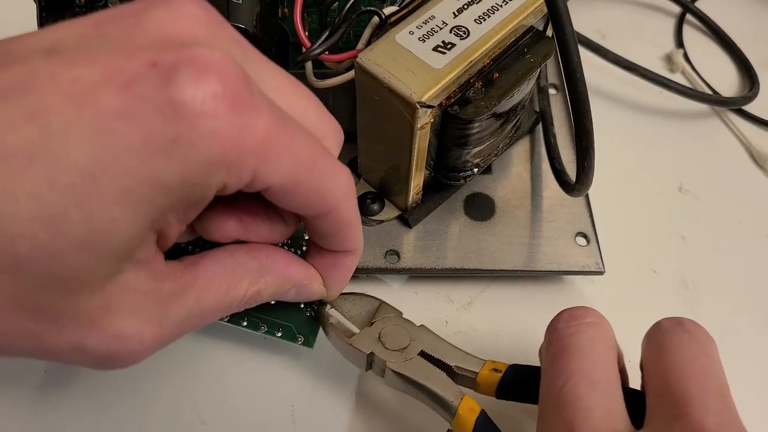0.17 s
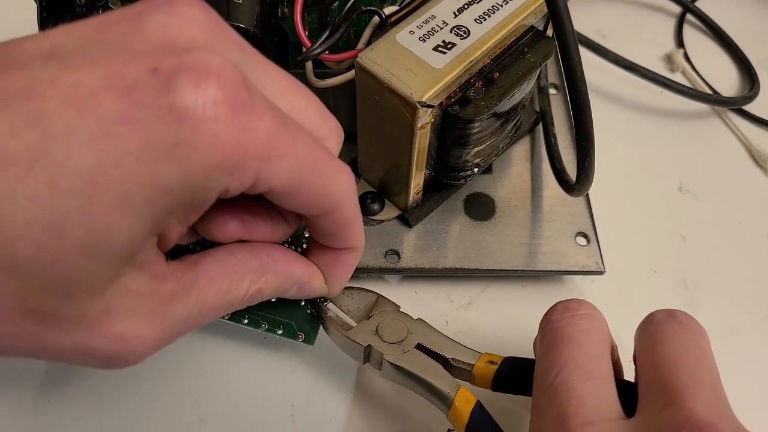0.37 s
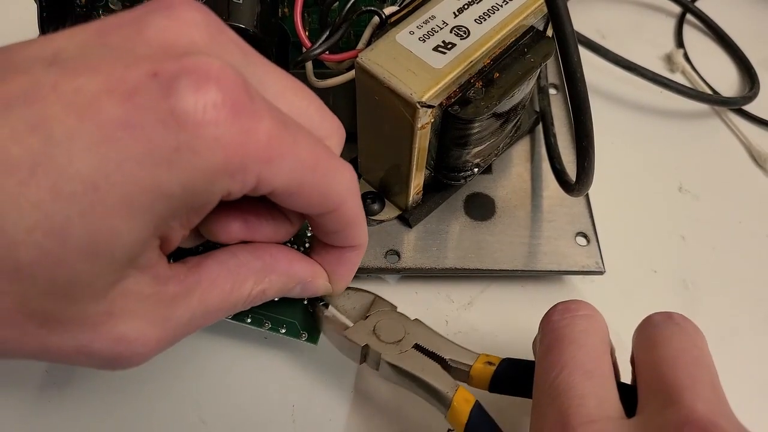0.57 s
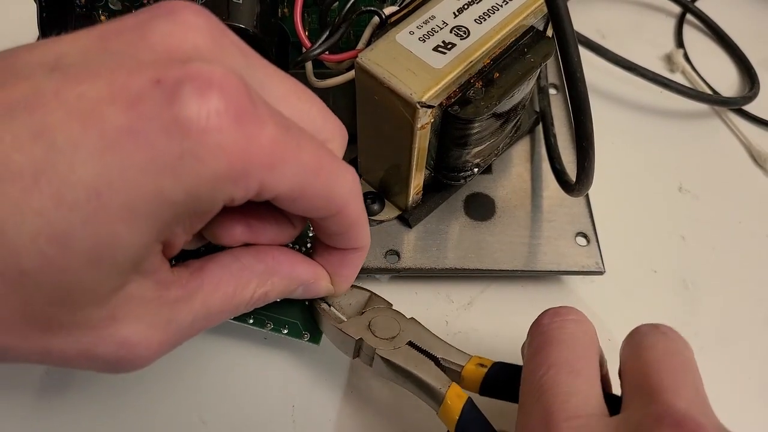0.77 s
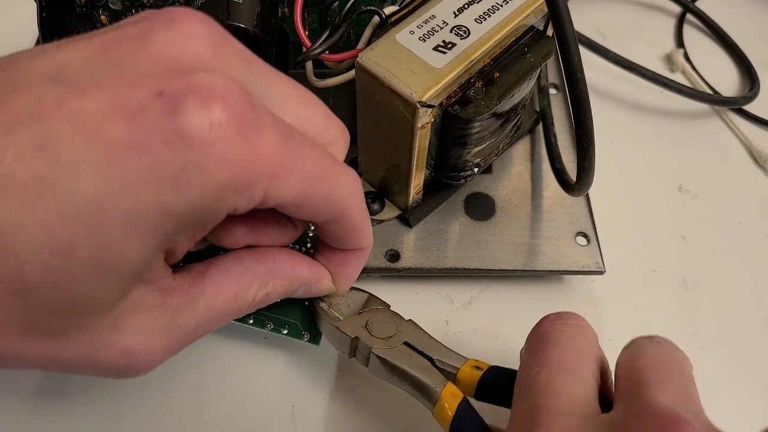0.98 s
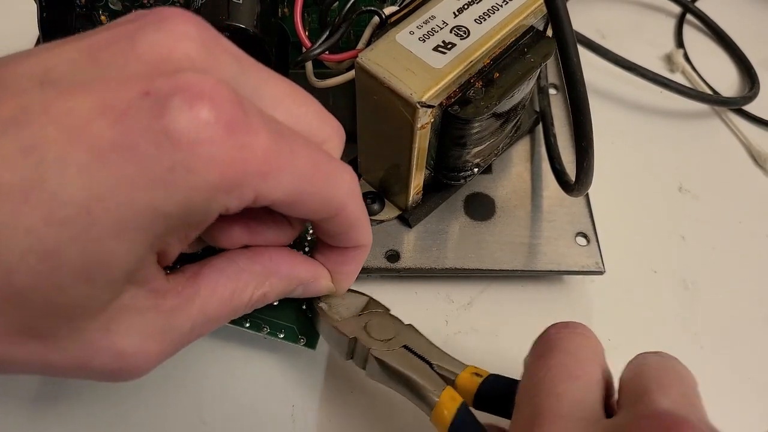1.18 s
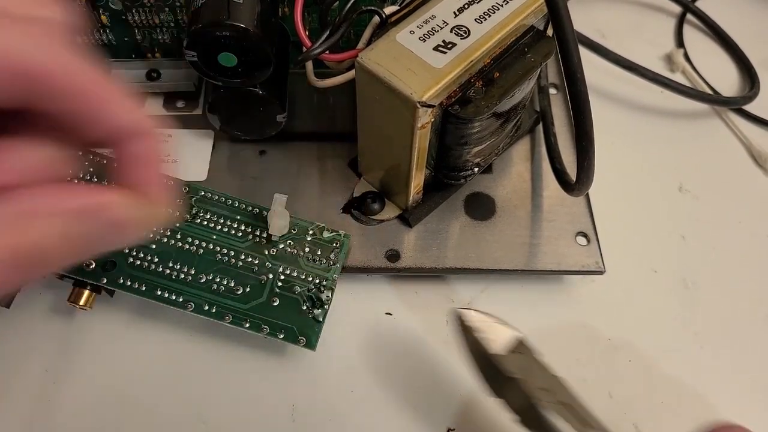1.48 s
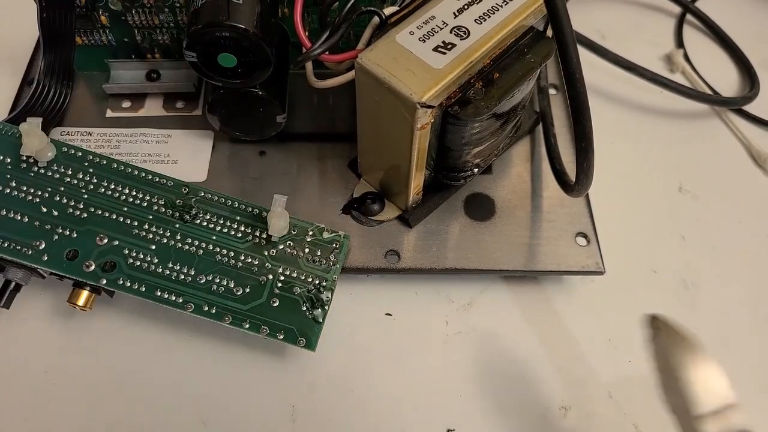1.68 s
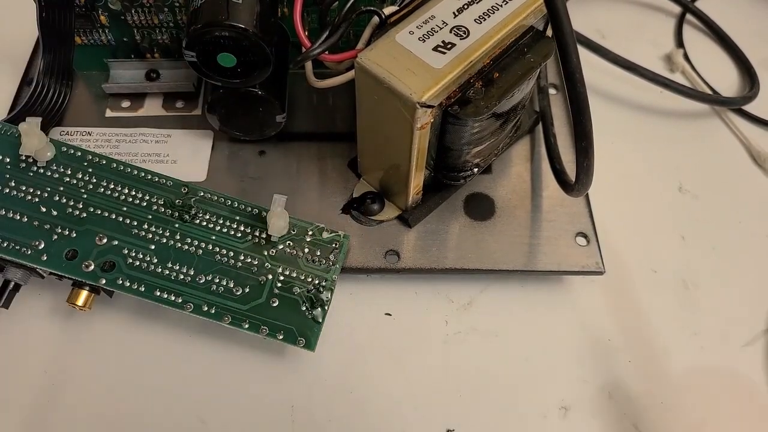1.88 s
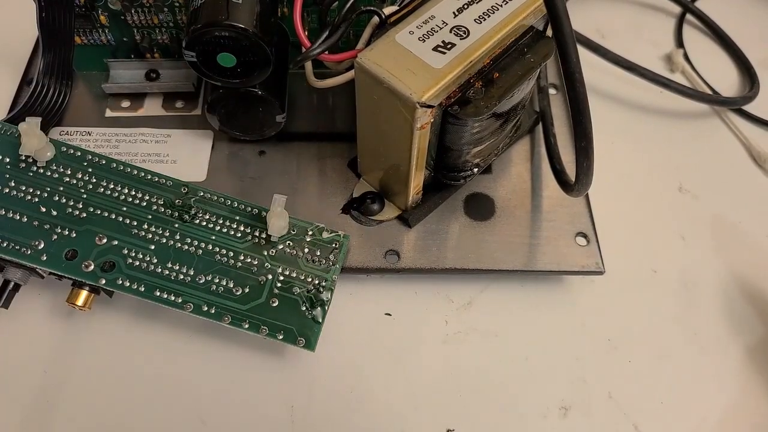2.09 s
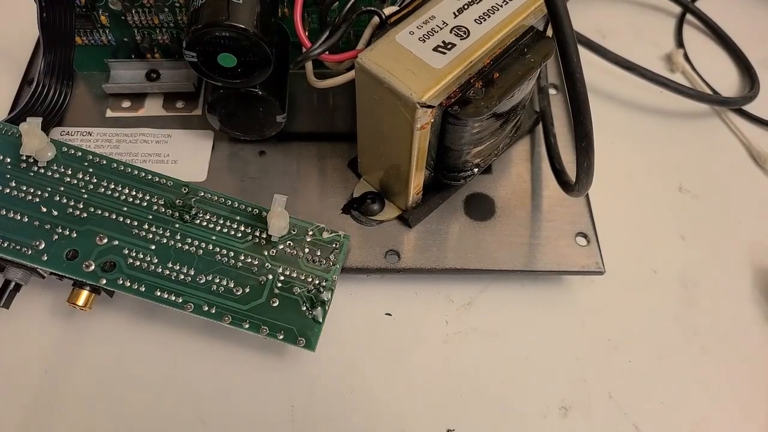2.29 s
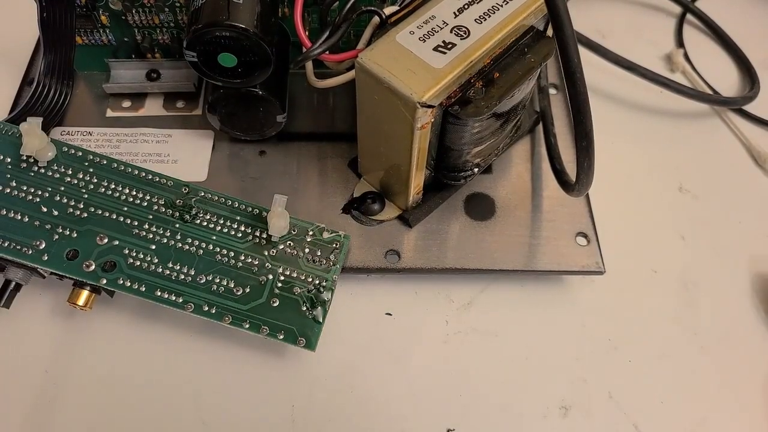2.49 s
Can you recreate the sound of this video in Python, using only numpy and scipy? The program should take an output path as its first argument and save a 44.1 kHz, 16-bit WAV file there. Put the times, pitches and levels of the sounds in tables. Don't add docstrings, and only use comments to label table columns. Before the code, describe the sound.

Close up in a quiet, faintly hissy room, cutter jaws scrape and tick on a circuit board, one crisp snip rings out, a sleeve brushes the bench, and the tool is put down with two bouncing knocks.

```python
import sys
import numpy as np
from scipy import signal
from scipy.fft import rfft, irfft
from scipy.io import wavfile
from scipy.ndimage import uniform_filter1d

SR = 44100
rng = np.random.default_rng(int(sys.argv[2]) if len(sys.argv) > 2 else 0)


def waveform_to_disk(signal):
    frames = np.transpose(np.atleast_2d(signal))
    scaled = np.clip(frames, -1, 1) * 32767
    samples = np.round(scaled).astype(np.int16)
    wavfile.write(sys.argv[1], SR, samples)


def linear_from_db(decibels):
    return 10 ** (np.asarray(decibels, float) / 20)


N = 116865
T = np.arange(N) / SR

SOUND_SIZE = 16384
LEAD_S = 0.004
PORT_UNLIKE = 0.86

# frequency in Hz, level in dB.
ROOM_TONE_COLOUR = [(25, -9), (240, -8.5), (450, -13.5), (1050, -21.5), (1700, -22), (3000, -18.5),
                    (6800, -26), (7400, -50), (11500, -31.5), (16000, -40.5), (16600, -75)]
# frequency in Hz, time to fall 60 dB in seconds.
ROOM_DECAY = [(100, 0.5), (500, 0.33), (2000, 0.32), (6000, 0.17), (15000, 0.26)]
# frequency in Hz, level in dB.
MIC_TOP = [(16600, 0), (17000, -30)]
# time in seconds, level in dB.
SLEEVE_LEVEL = [
    (1.6, -85),
    (1.721, -64),
    (1.9, -63),
    (2.0, -66.5),
    (2.098, -57),
    (2.2, -65.5),
    (2.299, -65),
]
# frequency in Hz, level in dB.
SLEEVE_COLOUR = [(80, -15.5), (280, 2.5), (700, -4.5), (1300, -11.5), (3500, -14.5), (5000, -18.5),
                 (8000, -32), (16000, -35)]
# start and end in seconds, level in dB, start and end frequency in Hz.
SLEEVE_WHISTLES = [
    (1.63, 1.73, -73, 1050, 1150),
    (1.78, 1.96, -72, 1740, 1880),
    (1.73, 1.93, -69.5, 3350, 3900),
    (1.62, 1.72, -79.5, 2750, 2300),
    (1.6, 4.6, -67, 601, 420),
    (2.07, 2.24, -65, 950, 910),
    (1.29, 1.56, -86, 740, 830),
    (2.09, 2.13, -57.5, 4400, 2400),
    (1.95, 2.2, -77.5, 3900, 4200),
]
# start in seconds, frequency in Hz, length in
# seconds, peak level in dB, # place of the peak from 0 to 1.
SQUEAKS = [
    (0.036, 2152, 0.023, -39.5, 0.37),
    (0.062, 2126, 0.058, -56.5, 0.1),
    (0.668, 2260, 0.019, -42, 0.66),
    (0.693, 2283, 0.036, -55.5, 0.15),
    (1.012, 1774, 0.0091, -48, .9),
    (2.306, 1080, 0.046, -46, .8),
]
# start in seconds, bench peak, board and jaws levels in dB,
# jaws resonance in Hz.
TAPS = [(0.058, -66, -69, -56.5, 2800), (0.075, -48, -66.5, -59.5, 1510), (0.09, -59.5, -67, -58.5, 2870),
        (0.104, -53, -66.5, -81, 2130), (0.203, -71, -75, -56, 2900), (0.265, -40.5, -57, -57, 2130),
        (0.315, -38.5, -52, -56.5, 2850), (0.344, -50, -88, -61.5, 2300), (0.376, -51, -73, -59, 2820),
        (0.507, -49.5, -49.5, -53.5, 1300), (0.534, -53.5, -63, -60.5, 2830),
        (0.553, -47, -63, -51.5, 2900), (0.608, -46.5, -55, -47, 1300), (0.623, -42, -66.5, -61, 1700),
        (0.744, -53.5, -75, -89, 2330), (0.816, -49.5, -56, -58.5, 2960), (1.223, -53, -70.5, -92.5, 1700),
        (1.555, -45, -60.5, -67, 2720), (1.614, -49, -64, -72, 2774), (1.721, -57, -74, -54, 1490),
        (1.735, -45.5, -62.5, -63, 3400), (1.922, -53, -77, -64, 3060), (1.995, -43.5, -69, -79, 1826),
        (2.078, -69, -83, -59, 2170), (2.11, -53.5, -64.5, -68, 2010)]
# frequency in Hz, level in dB, time to fall 60 dB in seconds.
BENCH_MODES = [(101, -13, 0.29), (169.5, -1.5, 0.2), (239.2, 5, 0.12), (280.6, -4.5, 0.22), (350, -8, 0.13)]
# frequency in Hz, level in dB, time to fall 60 dB in seconds.
BOARD_MODES = [(567, -1.5, 0.12), (666, -2.5, 0.14), (823, -9, 0.024), (1067, 4, 0.044), (1230, -1, 0.027),
               (1620, -2.5, .025)]
# frequency in Hz, level in dB.
JAWS_COLOUR = [(200, -33), (1500, 9), (3500, 0), (5000, -0.5), (7000, -22), (15000, -18.5)]
# start in seconds, crack level in dB, crack time to fall 60 dB in seconds,
# ring level in dB, lag of the left port in seconds.
BLOWS = [
    (1.0275, -13.5, 0.035, -18.5, -.00028),
    (2.3313, -20, 0.049, -12, .0001),
    (2.5852, -7, 0.044, -6, .0001),
]
# frequency in Hz, level in dB.
CRACK_COLOURS = [
    [(40, -51.5), (400, -16.5), (1000, -6), (2000, 2), (5300, -8), (6800, -19.5), (9000, -22.5),
     (15000, -30), (16500, -29.5)],
    [(60, -11), (300, -8), (700, -10), (1200, -8), (2200, -22.5), (5000, -34.5), (8000, -54),
     (16000, -63.5)],
    [(60, -18), (300, -0.5), (1100, 2), (2100, -3), (3500, -19), (6800, -28), (8500, -37.5), (15000, -40),
     (16500, -72)],
]
# frequency in Hz, level in dB, time to fall 60 dB in seconds.
BLOW_MODES = [
    [(95, -13.5, 0.148), (165.3, 1, 0.29), (241.4, 2, 0.21), (590, -7.5, .08), (1078, 11, 0.048),
     (1300, -0.5, .06), (1740, 7.5, 0.076), (2079, 15, 0.081), (2797, 1.5, 0.067), (3120, 5.5, 0.041),
     (3370, 1, 0.034), (4290, -2.5, 0.027), (5370, -10, 0.063), (8950, -3.5, 0.013)],
    [(168, -6, 0.11), (338, -6.5, 0.056), (553, 1, 0.066), (648, 1, 0.076), (729.5, 8.5, 0.048),
     (959, -2.5, 0.07), (1079, 7.5, 0.05), (1167, -2, 0.069), (1404, -8, .05), (1980, -12.5, .04),
     (2100, -17, 0.092), (3645, -33, .05)],
    [(168.6, -9, 0.19), (428, -11.5, 0.053), (544, -8, 0.1), (662, 1, 0.08), (833, -3.5, 0.076),
     (1097, 5, 0.052), (1143, -5.5, .07), (1425, -5, 0.046), (1660, -2, 0.05), (1995, -1.5, 0.035),
     (2093, -6.5, 0.06), (3400, -18, .04), (4570, -15.5, 0.037), (6760, -5, 0.024)],
]
# start in seconds, number of the blow it resembles, level in dB.
BOUNCES = [
    (2.3366, 1, 0.5),
    (2.342, 1, -10.5),
    (2.351, 1, -9),
    (2.5905, 2, -4),
    (2.603, 2, -12),
    (2.611, 2, -20.5),
    (1.044, 0, -17.5),
    (1.052, 0, -17.5),
]
# start in seconds, frequency in Hz, level in dB,
# time to fall 60 dB in seconds.
THUDS = [
    (1.086, 90.5, -47.5, 0.092),
    (1.145, 90.4, -58, .12),
    (1.2, 127, -53, 0.082),
    (2.274, 58.4, -42.5, 0.15),
    (2.323, 36, -40, 0.17),
    (2.365, 43.7, -34.5, 0.19),
    (2.589, 55.7, -53, .25),
    (2.331, 466, -5.5, 0.011),
    (2.58, 464, -11, 0.026),
]
# start in seconds, level in dB, frequency in Hz.
SPRING_TICKS = [
    (1.924, -47.5, 3500),
    (2.526, -45.5, 14300),
    (2.541, -50, 14000),
    (2.526, -60, 11000),
    (2.541, -57.5, 11000),
]
# share of the tick's frequency, level in dB.
TICK_COLOUR = [(.7, -30), (0.849, -5.5), (1.0, -1.5), (1.12, -8), (1.25, -43)]


def unit(x):
    return x / np.sqrt(np.mean(x ** 2))


def colour(x, points):
    p = np.array(points, float)
    hz = np.fft.rfftfreq(x.shape[-1], 1 / SR) + 1
    gain = linear_from_db(np.interp(np.log(hz), np.log(p[:, 0]), p[:, 1]))
    return irfft(rfft(x) * gain, x.shape[-1])


def band(x, hz, width_hz):
    return signal.lfilter(*signal.iirpeak(hz, hz / width_hz, fs=SR), x)


def fade(t60, size=SOUND_SIZE):
    return np.exp(-np.log(1000) * T[:size] / max(t60, 0.002))


def walk(rate):
    k = int(SR / rate)
    return unit(uniform_filter1d(uniform_filter1d(rng.standard_normal(N), k), k))


def narrow(hz):
    k = int(7 * SR / hz.mean())
    slow = uniform_filter1d(uniform_filter1d(rng.standard_normal((2, 2, N)), k), k)
    phase = 2 * np.pi * np.cumsum(hz) / SR
    return slow[0] * np.cos(phase) + slow[1] * np.sin(phase)


def ring(modes, scatter_db, detune=0.0076, rise_s=0.003):
    chance = rng.standard_normal((len(modes), 3))
    t = np.maximum(T[:SOUND_SIZE] - LEAD_S, 0)
    side = np.array([[1], [-1]])
    x = 0
    for (hz, db, t60), (strength, pitch, spread) in zip(modes, chance):
        decay = linear_from_db(db + scatter_db * strength) * np.exp(-np.log(1000) * t / t60)
        port_phase = side * PORT_UNLIKE * spread * min(hz / 650, 1)
        x = x + decay * np.sin(2 * np.pi * hz * (1 + detune * pitch) * t + port_phase)
    return x * np.minimum(t / rise_s, 1) / np.sqrt(sum(linear_from_db(2 * m[1]) for m in modes))


def burst(points, t60, rise_s=0.0023):
    n = rng.standard_normal((3, SOUND_SIZE))
    n = np.array([n[0] + PORT_UNLIKE * n[1], n[0] + PORT_UNLIKE * n[2]])
    envelope = np.clip((T[:SOUND_SIZE] - LEAD_S) / rise_s, 0, 1) * fade(t60)
    start = fade(t60)[int(LEAD_S * SR)]
    return colour(n * envelope, points) / np.std(colour(n, points)) / start


def add(out, x, s, lag=0., pan_db=0.):
    x = x * np.ones((2, 1))
    for ch, (t, g) in enumerate([(s + lag / 2, pan_db / 2), (s - lag / 2, -pan_db / 2)]):
        i = int(round((t - LEAD_S) * SR))
        out[ch, i:i + x.shape[1]] += linear_from_db(g) * x[ch, :N - i]


def room_tone():
    mid, side = (colour(rng.standard_normal(N), ROOM_TONE_COLOUR) for _ in range(2))
    side = colour(side, [(100, -9.0), (600, -0.5)])
    wide = np.array([mid + side, mid - side]) / np.sqrt(np.mean(mid ** 2))
    wide = wide * linear_from_db(-73.5 + 2.3 * walk(6.1))
    port_hz, port_width_hz = 6363, 370
    hiss = band(rng.standard_normal((2, N)), port_hz, port_width_hz)
    hiss = band(hiss, port_hz, port_width_hz)
    hum = band(rng.standard_normal(N), 236.5, 20)
    return wide + linear_from_db(-78) * unit(hiss) + linear_from_db(-76) * unit(hum)


def room(x):
    p, size, tail = np.array(ROOM_DECAY), N // 4, 0
    for hz in 60 * 2 ** np.arange(0, 8.2, 0.5):
        n = rng.standard_normal((2, size))
        n[1] += (n[0] - n[1]) * np.clip(1 - hz / 900, 0, 1)
        t60 = np.interp(np.log(hz), np.log(p[:, 0]), p[:, 1])
        tail = tail + band(n, hz, hz / 3) * fade(t60, size)
    tail = tail * np.minimum(T[:size] / 0.018, 1)
    tail = tail / np.sqrt(np.sum(tail ** 2) / 2)
    return signal.fftconvolve(x.mean(0)[None], tail)[:, :N]


def sleeve():
    c = np.array(SLEEVE_LEVEL)
    grain_db = rng.exponential(size=(2, N)) + 1.3 * walk(40)
    grains = rng.standard_normal((2, N)) * linear_from_db(grain_db)
    level_db = np.interp(T, c[:, 0], c[:, 1], left=-99)
    level_db = level_db - 60 * np.clip((T - 2.33) / 0.1, 0, 1)
    out = unit(colour(grains, SLEEVE_COLOUR)) * linear_from_db(level_db)
    for start, end, db, hz, end_hz in SLEEVE_WHISTLES:
        gate = np.clip(np.minimum(T - start, end - T) / 0.026, 0, 1)
        whistle = unit(narrow(np.interp(T, [start, end], [hz, end_hz])))
        out = out + linear_from_db(db + 2 * walk(22)) * gate * whistle
    return out


def squeaks():
    out = np.zeros((2, N))
    sag, octave_db = 0.02, -12
    for s, hz, length, db, top in SQUEAKS:
        u = np.linspace(0, 1, int(length * SR))
        phase = 2 * np.pi * np.cumsum(hz * (1 + sag * (1 - 2 * u))) / SR
        shape = np.sin(np.pi / 2 * np.minimum(u / top, (1 - u) / (1 - top))) ** 0.96
        tone = np.sin(phase) + linear_from_db(octave_db) * np.sin(2 * phase)
        add(out, linear_from_db(db) * shape * tone, s + LEAD_S, 0.0001, 5.)
    return out


def taps():
    out = np.zeros((2, N))
    contact_s = 0.0021
    for s, bench_db, board_db, jaws_db, hz in TAPS:
        steel = burst(JAWS_COLOUR, 0.051, contact_s)
        steel = steel + linear_from_db(1) * band(steel, hz, 160) * 4
        bench = ring(BENCH_MODES, 4.34, 0.038, contact_s)
        board = ring(BOARD_MODES, 2, 0.016, contact_s)
        x = linear_from_db(bench_db - 1.5) * bench + linear_from_db(board_db + 9.5) * board + linear_from_db(jaws_db - 0.5) * steel
        add(out, x, s, -0.00028, 1.5)
    return out


def thuds():
    out = np.zeros((2, N))
    for s, hz, db, t60 in THUDS:
        add(out, -linear_from_db(db) * ring([(hz, 0, t60)], 0, 0, 0.33 / hz), s, 0, 3.)
    return out


def spring_ticks():
    out = np.zeros((2, N))
    for s, db, hz in SPRING_TICKS:
        points = [(hz * share, g) for share, g in TICK_COLOUR]
        add(out, linear_from_db(db) * burst(points, 0.018, 0.0003), s)
    return out


def blows():
    out = np.zeros((2, N))
    swell_db, snap_db, wash_db = (-24, -25.5, -23), (1, 2, 0), (-20.5, -11.5, -14.5)
    for s, k, db in [(b[0], k, 0) for k, b in enumerate(BLOWS)] + list(BOUNCES):
        k = int(k)
        _, crack_db, t60, ring_db, lag = BLOWS[k]
        crack = linear_from_db(crack_db) * burst(CRACK_COLOURS[k], t60)
        struck = linear_from_db(ring_db) * ring(BLOW_MODES[k], 0.93, 0.008, 0.0021)
        add(out, linear_from_db(db) * (crack + struck), s, lag, -1.5)
    for k, (s, db, _, _, lag) in enumerate(BLOWS):
        points = CRACK_COLOURS[k]
        add(out, linear_from_db(db + snap_db[k]) * burst(points, 0.015, 0.00011), s, lag, -1.5)
        swell = burst(points, 0.043)[:, ::-1]
        add(out, linear_from_db(db + swell_db[k]) * swell, s - SOUND_SIZE / SR + 2 * LEAD_S, lag)
        wash = burst(points, 0.21, 0.012)
        add(out, linear_from_db(db + wash_db[k]) * wash, s, lag)
    return out


def scene():
    background = room_tone() + sleeve()
    pivot = squeaks()
    struck = taps() + thuds() + spring_ticks() + blows()
    echoes = room(linear_from_db(-13.5) * struck + linear_from_db(-17) * pivot)
    return background + pivot + struck + echoes


def top_cut(x):
    return signal.sosfilt(signal.butter(12, 17000, fs=SR, output="sos"), x)


def record(dry):
    limit = 1.1
    mix = colour(limit * np.tanh(dry / limit), MIC_TOP)
    return top_cut(mix)


dry = scene()
out = record(dry)
waveform_to_disk(out)
```